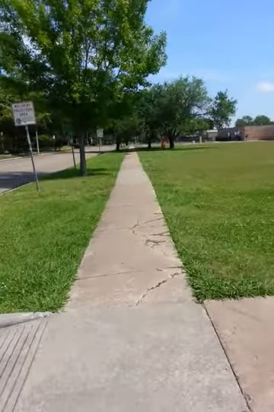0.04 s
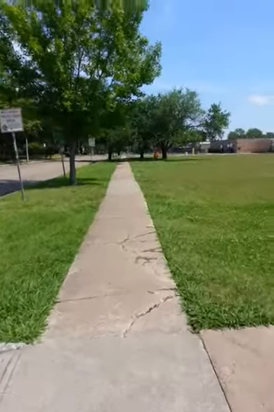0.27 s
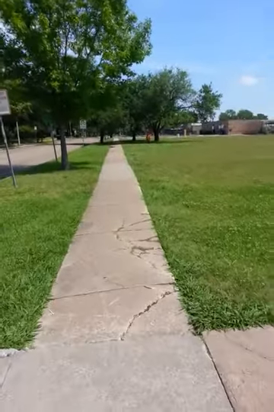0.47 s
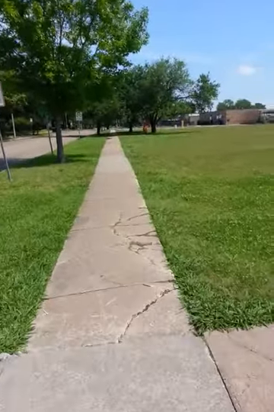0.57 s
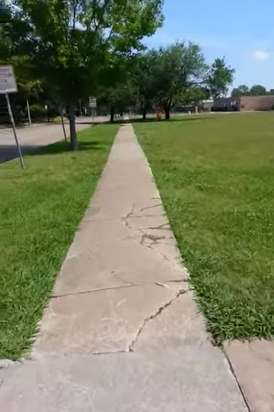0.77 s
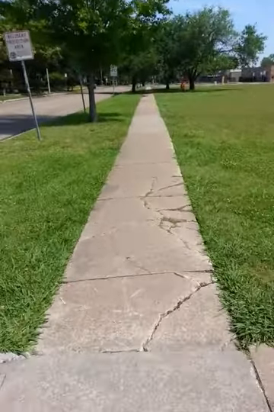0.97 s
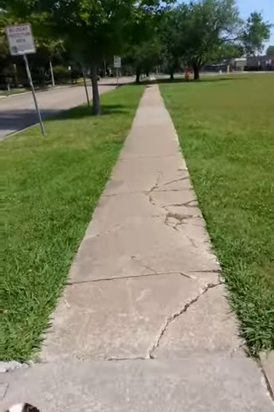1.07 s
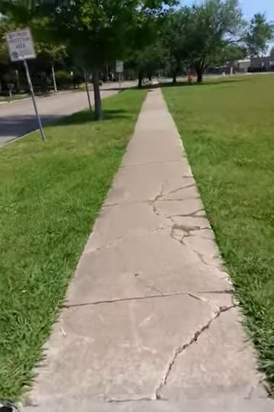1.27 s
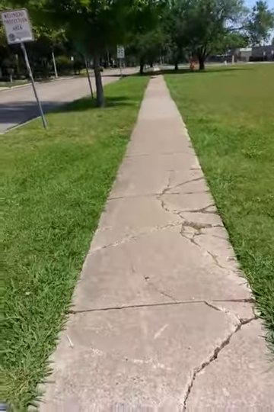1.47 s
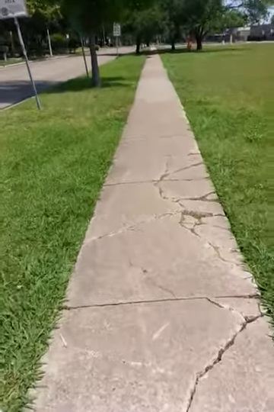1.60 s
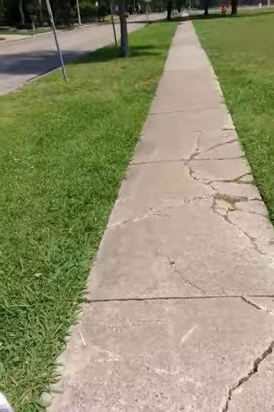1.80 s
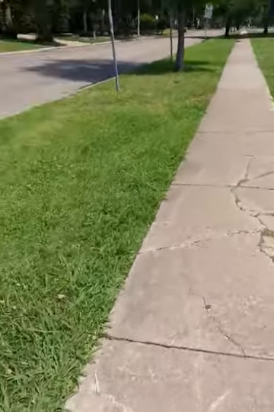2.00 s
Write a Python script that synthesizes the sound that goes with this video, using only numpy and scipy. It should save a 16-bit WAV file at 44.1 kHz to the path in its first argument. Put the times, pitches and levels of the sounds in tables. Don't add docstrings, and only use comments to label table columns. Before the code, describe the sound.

Low wind thumps on the microphone over gritty walking scuffs, cloth rustle and faint sparrow chirps

```python
import sys
import numpy as np
from scipy import signal
from scipy.io import wavfile

SR = 44100
rng = np.random.default_rng(int(sys.argv[2]) if len(sys.argv) > 2 else 0)


def magnitude_from_level(level_db):
    exponent = np.asarray(level_db, float) / 20
    return 10 ** exponent


def store_wav(level_fs):
    pcm = np.round(np.clip(np.atleast_2d(level_fs), -1, 1) * 32767)
    wavfile.write(sys.argv[1], SR, pcm.T.astype(np.int16))


N = 90360
T = np.arange(N) / SR


def rustle():
    # [t/s, level/dB]
    swing = [(0, -47), (.07, -54), (.11, -55), (.27, -56.5), (.54, -57), (.73, -58.5), (.87, -62),
             (0.896, -48.5), (.95, -48), (1.0, -45), (1.07, -47), (1.2, -51.5), (1.34, -54.5), (1.44, -53),
             (1.5, -51.5), (1.7, -51.5), (1.88, -60.5), (2.05, -50)]
    # [f/Hz, density/dB]
    rustle_colour = [(700, 4), (1500, 4), (2500, 2), (4000, 1), (6000, 2.5), (8000, -6), (11000, -5),
                     (16000, -4.5)]
    grains_per_s, spread_db, trim_db = 3000, 2.5, -2.5
    hits = rng.random(N) < grains_per_s / SR
    grains = hits * magnitude_from_level(spread_db * np.minimum(rng.exponential(1, N), 5))
    t_s, level_db = np.transpose(swing)
    noise = bank(white() * (grains + 0.69), rustle_colour, patch_db=.8, rate_hz=26, near=True)
    return magnitude_from_level(np.interp(T, t_s, level_db) + trim_db) * noise


def scuffs():
    # [t/s, peak/dB, left-right/dB, length/s]
    scuff_events = [(0.021, -41, 4, 0.0068), (0.048, -27.5, 4, 0.0074), (0.053, -29, -0.5, 0.012),
                    (0.232, -34, 8, 0.01), (0.2366, -28.5, 5, 0.011), (0.2725, -30, -2.5, 0.0075),
                    (0.276, -26.5, -1.5, 0.009), (0.339, -47, 12.5, 0.057), (0.353, -34, 5, .006),
                    (0.36, -33, 5, 0.0073), (0.446, -49, 6, 0.019), (.489, -31.5, -4, 0.0096),
                    (0.493, -45, 8, 0.026), (0.568, -45, 5, 0.1), (0.638, -44.5, 2, 0.022),
                    (0.699, -47, 2, 0.031), (0.706, -32, -3, 0.008), (.8915, -34, 6, 0.0043),
                    (0.896, -39, 6, 0.005), (0.902, -41, 6, 0.0049), (.91, -34, 9, 0.0072),
                    (0.925, -28.5, 2, 0.008), (0.964, -35.5, 0, 0.013), (0.973, -28, 0, 0.0074),
                    (1.026, -25, -8, 0.0066), (1.068, -32, 0, 0.0088), (1.454, -43, 14, 0.03),
                    (1.461, -28.5, 4, 0.0073), (1.686, -33, 2, 0.0095), (1.939, -49, -8, 0.046),
                    (1.981, -35, 0, 0.0095)]
    # [f/Hz, density/dB]
    scuff_colour = [(2500, 0), (3800, -7), (5000, 4.5), (7000, 3.5), (10000, -0.5), (16000, -12)]
    rise_s, lead_s, min_length_s, trim_db = 0.0042, .0015, .004, -15
    gate = 0
    for t_s, peak_db, pan_db, length_s in scuff_events:
        burst = swell(t_s - lead_s, max(length_s, min_length_s), rise_s)
        decay = np.exp(-np.clip(T - t_s, 0, 1) / length_s * 0.46)
        gate = gate + magnitude_from_level(peak_db + trim_db) * sides(pan_db) * burst * decay
    return gate * bank(white(), scuff_colour, patch_db=1, rate_hz=150, near=True)


def taps():
    # [t/s, level/dB, band centre f/Hz, length/s]
    tap_events = [(0.003, -55, 1850, 0.12), (0.264, -63, 2330, 0.19), (0.293, -51, 600, 0.018),
                  (0.344, -56, 1150, 0.033), (0.793, -52, 540, 0.02), (0.974, -46.5, 740, 0.015),
                  (0.996, -56, 11300, 0.093), (1.043, -55, 2050, 0.082), (1.092, -59, 7400, 0.04),
                  (1.171, -45.5, 720, 0.008), (1.405, -56.5, 1960, 0.077), (1.601, -52.5, 3800, 0.039),
                  (1.639, -53, 900, 0.021), (1.73, -74, 1270, .02), (1.983, -49.5, 724, 0.051)]
    half_width = .5 / 2.2
    out, noise = 0, rng.standard_normal((2, N))
    source = noise[0] + 3.2 * noise
    for t_s, level_db, hz, length_s in tap_events:
        edges_hz = [hz * (1 - half_width), hz * (1 + half_width)]
        band = signal.butter(2, edges_hz, "band", fs=SR, output="sos")
        puff = rms_one(signal.sosfilt(band, source))
        out = out + magnitude_from_level(level_db) * swell(t_s, length_s, length_s / 3) * puff
    return out


def wind():
    # [t/s, level/dB]
    left_gusts = [
        [(0.17, -56), (0.208, -29.5), (0.282, -37), (0.302, -39.5), (0.362, -36.5), (0.425, -39.5), (0.46, -66),
         (0.47, -47.5)],
        [(1.44, -37), (1.454, -66), (1.472, -22.5), (1.498, -22), (1.674, -21.5), (1.71, -39), (1.74, -22)],
    ]
    # [t/s, length/s, level/dB]
    right_gusts = [
        (0.186, 0.18, -34.5),
        (0.492, 0.038, -49),
        (0.644, 0.098, -38),
        (0.839, 0.051, -27.5),
        (1.305, 0.069, -35),
        (1.358, 0.15, -28.5),
        (1.49, 0.117, -35),
        (1.766, 0.033, -20.5),
        (1.874, 0.034, -15.5),
        (1.946, 0.059, -32),
    ]
    # [f/Hz, density/dB]
    left_colour = [(15, -59), (25, -18), (70, -0.5), (177, -3.5), (241, 3.5), (380, -21), (412, -11.5),
                   (525, -62), (1200, -81), (1560, -69), (2640, -120)]
    # [f/Hz, density/dB]
    right_colour = [(25, -29), (60, 4.5), (110, 1.5), (200, -3.5), (350, -80), (600, -25)]
    edge_s, lumps_per_s, left_trim_db = 0.022, 17.5, 1
    left, right = 0, 0
    for gust in left_gusts:
        t_s, level_db = np.transpose(gust)
        level = magnitude_from_level(np.interp(T, t_s, level_db) + left_trim_db)
        left = left + level * swell(t_s[0], t_s[-1] - t_s[0], edge_s)
    for t_s, length_s, level_db in right_gusts:
        right = right + magnitude_from_level(level_db) * swell(t_s, length_s, edge_s)
    left_noise = bank(white(), left_colour, 0, lumps_per_s)[0]
    right_noise = bank(white(), right_colour, 0, lumps_per_s)[0]
    return np.array([left * left_noise, right * right_noise])


def buffets():
    # [t/s, level/dB, ring f/Hz]
    eddies = [(0.2036, -16, 197), (.213, -22.5, 408), (0.22, -20, 111), (.245, -35.5, 347),
              (0.282, -24.5, 72), (0.383, -28, 91), (.411, -24.5, 197), (1.473, -9, 120),
              (1.497, -9.5, 205), (1.504, -12.5, 373), (1.508, -8.5, 204), (1.537, -4, 189),
              (1.556, -14.5, 400), (1.559, -18.5, 103), (1.588, -7.5, 215), (1.602, -7.5, 193),
              (1.615, -10.5, 201), (1.633, -7, 195), (1.646, -14, 353), (1.653, -12.5, 197),
              (1.663, -10, 188), (1.683, -18.5, 238), (1.695, -20, 300)]
    decay_cycles, rise_cycles = 2.18, 0.79
    rings = 0
    for t_s, level_db, hz in eddies:
        cycles = np.clip(T - t_s, 0, 1) * hz
        envelope = np.minimum(cycles / rise_cycles, 1) * np.exp(-(cycles / decay_cycles) ** 2)
        rings = rings + magnitude_from_level(level_db) * envelope * np.sin(2 * np.pi * cycles)
    return rings * [[1], [0]]


def sparrow():
    # [t/s, f/Hz, level/dB]
    chirps = [
        [(1.16, 5330, -66), (1.184, 6010, -56), (1.198, 5640, -61), (1.21, 5890, -52.5), (1.235, 5600, -83)],
        [(1.252, 4360, -61), (1.268, 5030, -60), (1.286, 5720, -57.5), (1.302, 6070, -52.5), (1.333, 6000, -75)],
        [(1.355, 4530, -61), (1.374, 4800, -56.5), (1.388, 5550, -55), (1.4, 5580, -67), (1.412, 5500, -76)],
        [(1.462, 4970, -64), (1.478, 4830, -58), (1.492, 4700, -56), (1.52, 4580, -74)],
        [(1.595, 4010, -60), (1.615, 4460, -62), (1.638, 4440, -57), (1.66, 4660, -58), (1.69, 4500, -61)],
        [(1.745, 4130, -53), (1.762, 4550, -62.5), (1.782, 4820, -61), (1.81, 4816, -55), (1.826, 4880, -69)],
    ]
    # [flutter depth/1, buzz f/Hz]
    voicing = [
        (.9, 180),
        (.7, 150),
        (.7, 160),
        (.6, 170),
        (.4, 80),
        (.9, 35),
    ]
    # [delay/s, level/dB]
    note_echoes = [
        (.009, -5),
        (.017, -8),
        (.028, -11),
    ]
    flutter_hz, edge_s, pan_db = 460, .006, 3
    out, buzz = 0, drift(250)
    flutter = np.cos(2 * np.pi * flutter_hz * T)
    for note, (depth, buzz_hz) in zip(chirps, voicing):
        t_s, hz, level_db = np.transpose(note)
        pitch_hz = np.interp(T, t_s, hz) + buzz_hz * buzz
        level = magnitude_from_level(np.interp(T, t_s, level_db) + 2.1 * buzz)
        level = level * swell(t_s[0], t_s[-1] - t_s[0], edge_s)
        out = out + level * (1 + depth * flutter) * tone(pitch_hz)
    echoes = sum(magnitude_from_level(db) * np.roll(out, int(delay_s * SR)) for delay_s, db in note_echoes)
    return sides(pan_db) * (out + echoes * [[1], [-1]])


def whistler():
    # [t/s, f/Hz, level/dB]
    line = [
        (.06, 6900, -70),
        (.075, 6750, -69),
        (0.151, 7100, -66),
        (.2, 7100, -68),
        (0.28, 7080, -75),
        (.31, 7050, -90),
        (.36, 7030, -75),
        (.4, 7000, -90.5),
    ]
    t_s, hz, level_db = np.transpose(line)
    pitch_hz = np.interp(T, t_s, hz) + 70 * drift(53)
    level = magnitude_from_level(np.interp(T, t_s, level_db, -120, -120) + 1.5 * drift(21))
    return sides(-16) * level * tone(pitch_hz)


def road():
    # [f/Hz, density/dB]
    road_colour = [(15, -55), (25, -62), (43, -8), (112, 2), (300, -11.5), (456, -28.5), (681, -18),
                   (1120, -29), (3000, -36.5), (3900, -101), (6600, -120)]
    return magnitude_from_level(-40.5) * bank(white(), road_colour, patch_db=0.85, rate_hz=10.6)


def bank(source, colour, patch_db, rate_hz, near=False):
    # [f/Hz, likeness/1]
    likeness = [(60, 0.43), (130, 0.8), (290, 0.67), (630, 0.66), (1400, 0.017)]
    near_likeness, near_hz, lag_samples = .4, 2500, 12
    out, together = 0, drift(rate_hz / 2)
    edges_hz = colour[0][0] * 2 ** np.arange(-.5, 10, .5)
    edges_hz = edges_hz[edges_hz < min(colour[-1][0] * 1.3, 20000)]
    for k, (low, high) in enumerate(zip(edges_hz, edges_hz[1:])):
        band = signal.butter(2, [low, high], "band", fs=SR, output="sos")
        common, opposed = signal.sosfilt(band, source[k % 2])
        hz = np.sqrt(low * high)
        if near:
            alike = near_likeness * min(1, near_hz / hz)
        else:
            alike = np.clip(at_hz(likeness, hz), 0, 1)
        gain = magnitude_from_level(at_hz(colour, hz) + patch_db * (together + 1.57 * drift(rate_hz)))
        pair = np.sqrt(1 + alike) * common + np.sqrt(1 - alike) * opposed * [[1], [-1]]
        out = out + gain * pair
    if near:
        out[1] = np.roll(out[1], lag_samples)
    return rms_one(out)


def rms_one(x):
    return x / np.sqrt(np.mean(x ** 2) + 1e-20)


def at_hz(points, hz):
    f_hz, value = np.transpose(points)
    return np.interp(np.log(hz), np.log(f_hz), value)


def drift(rate_hz):
    r = np.exp(-40 * np.pi * rate_hz / SR)
    steps = rng.standard_normal(N // 20 + 2002)
    slow = signal.lfilter([1], [1, -2 * r, r * r], steps)[2000:]
    return np.interp(np.arange(N) / 20, np.arange(len(slow)), rms_one(slow))


def white():
    return rng.standard_normal((2, 2, N))


def tone(pitch_hz):
    return np.sin(2 * np.pi * np.cumsum(pitch_hz) / SR)


def swell(start_s, length_s, edge_s):
    return np.clip(np.minimum(T - start_s, start_s + length_s - T) / edge_s, 0, 1) ** 2


def sides(pan_db):
    return magnitude_from_level(np.array([[pan_db / 2], [-pan_db / 2]]))


def scene():
    high_pass = signal.butter(2, 55, "high", fs=SR, output="sos")
    gusts = signal.sosfilt(high_pass, wind() + buffets())
    return rustle() + scuffs() + taps() + gusts + sparrow() + whistler() + road()


def band_limit(x):
    return signal.sosfilt(signal.butter(12, 14650, fs=SR, output="sos"), x)


def record(dry):
    # [f/Hz, width/Hz, boost/dB, level/dB]
    ports = [
        (5835, 1350, 10.5, 1.5),
        (7480, 1730, 13, -1.5),
    ]
    out = []
    for x, (hz, width_hz, boost_db, level_db) in zip(dry, ports):
        r = np.exp(-np.pi * width_hz / SR)
        poles = [1, -2 * r * np.cos(2 * np.pi * hz / SR), r * r]
        ring = signal.lfilter([(1 - r * r) / 2, 0, (r * r - 1) / 2], poles, x)
        out.append(magnitude_from_level(level_db) * (x + (magnitude_from_level(boost_db) - 1) * ring))
    shelf = signal.butter(2, 10600, "high", fs=SR, output="sos")
    out[1] = out[1] + (magnitude_from_level(3) - 1) * signal.sosfilt(shelf, out[1])
    low_pass = signal.cheby2(12, 70, 15600, fs=SR, output="sos")
    mix = signal.sosfilt(low_pass, np.array(out))
    return band_limit(mix)


dry = scene()
out = record(dry)
store_wav(out)
```